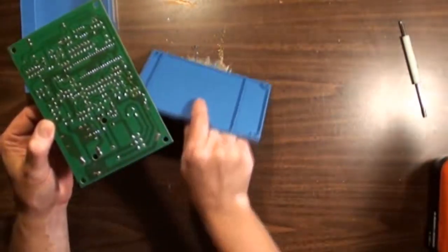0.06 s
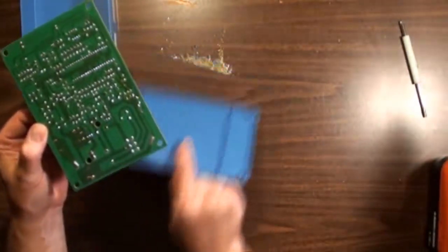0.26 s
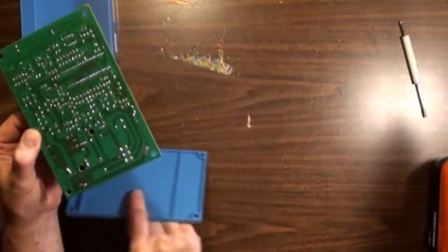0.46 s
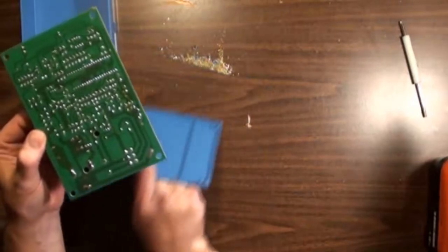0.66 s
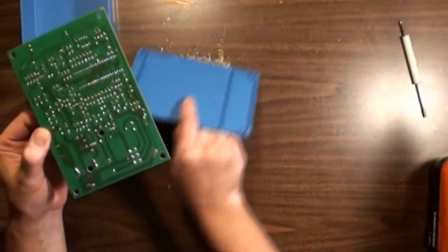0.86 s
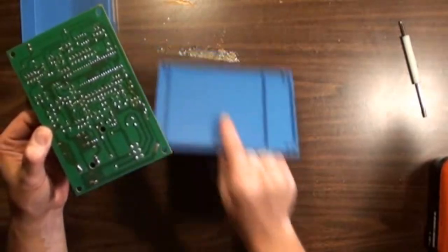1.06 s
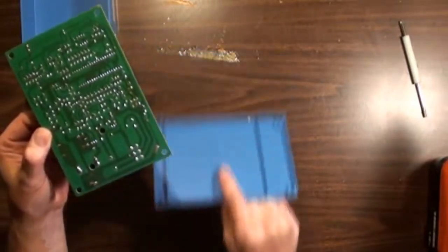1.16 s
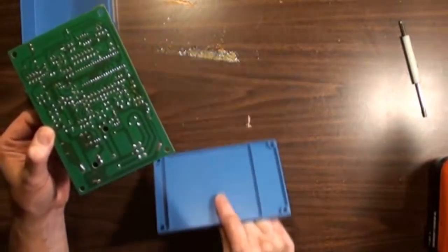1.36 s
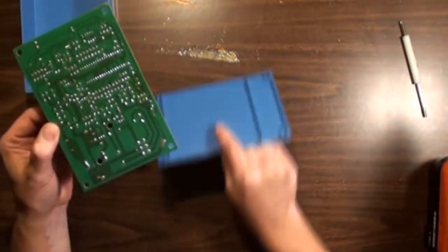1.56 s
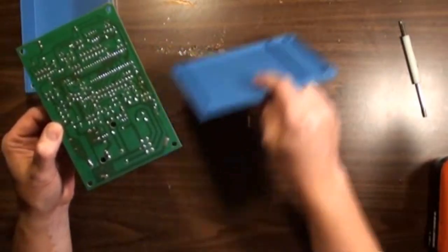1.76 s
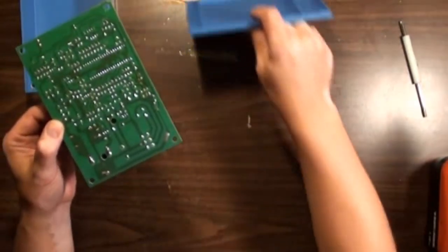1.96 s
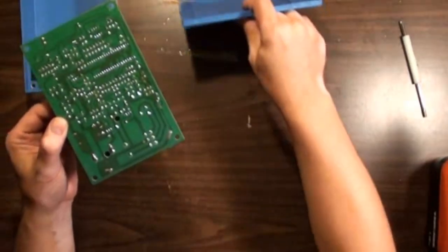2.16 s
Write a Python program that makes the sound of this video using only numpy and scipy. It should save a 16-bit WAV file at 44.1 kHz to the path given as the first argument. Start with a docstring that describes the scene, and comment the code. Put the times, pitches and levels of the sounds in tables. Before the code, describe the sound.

Hollow plastic housing knocked down and scraped across a wooden table in two gritty sweeps

```python
"""Plastic housing pushed through metal shavings

Close on a wooden table in a quiet room, stereo microphone: a hollow plastic housing is set down and pushed in two sweeps.
Random clicks of grit and shavings under its edge are filtered for the scrape and ring modes of shell and table top.
Blows are decaying noise bursts, part direct and part through the shell; short pushes ring the table as thuds.
Further off, sparse reflections answer the housing, over filtered noise for hiss and two faint sine whines.
"""
import sys
import numpy as np
from scipy import signal
from scipy.io import wavfile
from scipy.ndimage import uniform_filter1d, map_coordinates

SR = 44100
rng = np.random.default_rng(int(sys.argv[2]) if len(sys.argv) > 2 else 0)


def to_wav(sig):
    """Store sig (one row per channel, or 1-D mono) as 16-bit WAV at the path in sys.argv[1].

    Samples outside -1..1 are clipped; the rate is SR.
    """
    pcm = np.clip(np.atleast_2d(sig), -1, 1) * 32767
    pcm = np.round(pcm).astype(np.int16)
    wavfile.write(sys.argv[1], SR, pcm.T)  # frames by channels


def decibels_to_gain(level_db):
    """Convert a level in decibels to a linear amplitude gain (20 dB per decade)."""
    exponent = np.asarray(level_db, float) / 20
    return 10 ** exponent


N = 97020

# Spectrum of the room and microphone hiss: frequency_hz, density_db (per Hz, relative)
AIR_SPECTRUM = [(15, -65), (25, -16), (126, -6), (194, -12.5), (744, -8.5), (829, -14.5), (923, -11),
                (2430, -15), (3020, -18.5), (3270, -15), (15600, -23)]
# Faint whine in the room: pitch_hz, level_db (rms, before its small wavering)
WHINE_TONES = [(839.8, -67), (2519, -67)]
# Dying of the room's reflections: frequency_hz, t60_s
ROOM_DECAY = [(200, 0.2), (1500, 0.27), (8000, 0.14)]
# Modes of the wooden table top: pitch_hz, level_db (relative), t60_s
TABLE_MODES = [(69.4, -8, 0.57), (90, -27, .15), (136, 6, 0.67), (155, 2, 0.11), (204, 2.5, 0.36),
               (253, 10, 0.19), (326, -11.5, 0.22), (380, -21, 0.13)]
# Jolts into the table top: start_s, level_db (peak of one thud alone, before panning)
THUD_EVENTS = [(0.121, -50), (0.234, -27.5), (0.649, -19), (0.851, -45), (0.906, -34), (.99, -31),
               (1.452, -31), (1.71, -39), (1.77, -48), (1.93, -44)]
# Modes of the plastic shell: pitch_hz, level_db (relative), t60_s
SHELL_MODES = [(357, -9.5, .07), (412.3, -7, 0.097), (534, 1, 0.077), (619.5, -13.5, 0.12),
               (741.6, 7.5, 0.033), (895, 0.5, .04), (1060, -2, 0.017), (1123, -10, 0.055),
               (1190, -1, 0.048), (1291, 1, 0.053), (1348, -10.5, .05), (1463, 1.5, 0.025),
               (1730, 0.5, 0.016), (1770, -2, 0.023), (2190, -2, 0.028), (2860, -9, 0.024),
               (5000, -23, .02)]
# Blows of the housing on the wood: start_s, level_db (relative), hardness_hz, rattle_t60_s, struck_part_hz
BLOW_EVENTS = [(0.118, -43.5, 1390, 0.14, 945), (.146, -42.5, 910, 0.039, 514), (.17, -50, 800, 0.046, 400),
               (0.2353, -16.5, 2050, 0.13, 372), (0.269, -26, 600, 0.042, 387),
               (.642, -12.5, 1030, 0.046, 696), (0.652, -17.5, 990, 0.06, 660),
               (0.668, -14, 794, 0.053, 431), (.68, -14, 1320, 0.039, 720),
               (0.851, -15.5, 1480, 0.046, 1130), (1.028, -33, 1520, 0.026, 1200),
               (1.4495, -12.5, 8600, 0.16, 2860), (1.47, -21, 3000, 0.025, 2860),
               (1.5, -31, 3000, .03, 2860), (1.704, -12.5, 1200, 0.01, 730), (1.721, -28, 1190, 0.14, 735),
               (1.864, -19, 1630, 0.025, 1270), (1.921, -21.5, 8000, 0.024, 1130)]
# Spectrum of one grit click: frequency_hz, density_db (per Hz, relative)
GRIT_SPECTRUM = [(200, -28.5), (350, -13.5), (700, -7), (1420, -0.5), (2800, -3.5), (4280, -10),
                 (6300, -12), (7500, -15), (9000, -16.5), (12900, -30.5), (14000, -44), (17000, -110)]
# Spectrum of the metal shavings: frequency_hz, density_db (per Hz, relative)
SHAVINGS_SPECTRUM = [(3000, -28), (6200, -8.5), (7400, 3.5), (8800, -8), (12900, -14), (14200, -29),
                     (17000, -78)]
# The two sweeps, all levels relative; speed_db also scales the other three layers:
# time_s, speed_db, shell_pressure_db, table_weight_db, shavings_under_edge_db
SWEEP_PATHS = [
    [(0.26, -52, 11, 26, -13), (0.302, -47.5, 12.5, -3, 0.5), (0.406, -32.5, 4, -36, -2),
     (0.562, -24.5, -1, -29, -5), (0.628, -22.5, 5.5, -23, -7.5), (0.658, -26, 7, -8, -12),
     (0.694, -22.5, 9.5, -11, -13), (0.818, -27, -4, -36, -1.5), (0.86, -24.5, 8.5, -6, -13),
     (0.92, -31.5, 0.5, -16.5, -5), (0.964, -29.5, 7, -25, -5), (1.012, -25.5, 1, -12, -3),
     (1.046, -22.5, -10, -28, -7.5), (1.086, -29.5, -1, -29, -8), (1.182, -55.5, 0, -6, -25),
     (1.24, -64, -5, -26, -6)],
    [(1.5, -42.5, 6, -17, -12), (1.538, -46.5, 20, 9, 1), (1.584, -39, 10, -2, -5),
     (1.63, -28, 7.5, -26, -8.5), (1.692, -25, 7, -21, -7), (1.722, -24, 11, -24, -13),
     (1.764, -26, 1, -13, -6), (1.814, -22.5, 0.5, -31, -10), (1.834, -23, 4, -17, -12),
     (1.862, -24, -8, -14, -10.5), (1.92, -28, -3, -39, -5), (1.938, -32, 9.5, -30, -15),
     (2.008, -51.5, 4, -16, -20), (2.1, -67, -1, 10, -7)],
]
# Part of the shell that the sliding contact favours: time_s, favoured_hz
CONTACT_PATH = [(.3, 380), (.42, 1044), (.6, 1150), (.64, 700), (.67, 706), (.69, 1060), (.75, 1180),
                (.85, 1190), (.97, 1410), (1.04, 1240), (1.12, 1240), (1.5, 527), (1.57, 422), (1.63, 1130),
                (1.69, 1190), (1.71, 720), (1.74, 735), (1.78, 1260), (1.87, 1350), (1.92, 1120),
                (1.97, 1120)]

AIR_DB, AIR_SIDE_DB = -54.5, -8  # mid rms; side relative to mid
ROOM_DB, ROOM_LOW_HZ = -13, 365  # level of the reflections; low cut on what feeds them
PAN_DB = 0.25  # left up, right down
PUSH_S = 0.0045  # time constant of a push into the table
FAVOUR_DB, FAVOUR_OCTAVES = 17, 0.11  # boost and width around the touched part of the shell
CRACK_T60_S, CRACK_REACH, CRACK_TOP_HZ = 0.016, 3.4, 10260  # reach: times the blow's hardness
TICK_DB, RATTLE_DB = 1.5, -4.5  # direct crack and rattle, each relative to its peak
HARD_HZ = 3160  # the direct sound fades out for blows softer than this
SHELL_LOW_HZ, SHELL_TOP_HZ = 278, 3000  # low cut of the blows; high cut of the scraped shell
GRIT_PER_S, GRIT_SPREAD_DB, CLUMP_DB = 9000, 0.5, 0.5  # click rate; scales of size and clumping
SHIFT_DB = 3  # scale of each shell mode's random swelling
GRIT_DB, SHAVINGS_DB, SHELL_DB, TABLE_DB = 3, -2.5, -8, -1.5  # relative levels of the scrape's layers


def evened(x):
    """Signal scaled to an rms of one."""
    return x / np.sqrt(np.mean(x ** 2) + 1e-20)


def read(points, hz):
    """Curve read on a logarithmic frequency axis."""
    f, value = np.transpose(points)
    return np.interp(np.log(hz + 1), np.log(f + 1), value)


def coloured(x, points):
    """Causal minimum-phase filter with the given spectrum."""
    hz = abs(np.fft.fftfreq(4096, 1 / SR))
    log_gain = np.log(decibels_to_gain(np.maximum(read(points, hz), -100)))
    response = np.exp(np.conj(signal.hilbert(log_gain)))
    taps = np.fft.ifft(response).real[:2048]
    return signal.oaconvolve(x, taps)[:N]


def passed(x, hz, kind):
    """Third-order low or high pass."""
    sos = signal.butter(3, np.clip(hz, 20, 18000), kind, fs=SR, output="sos")
    return signal.sosfilt(sos, x)


def wander(per_s):
    """Straight lines between random normal values, per_s of them a second."""
    knots = rng.standard_normal(400)
    return map_coordinates(knots, [np.arange(N) * per_s / SR], order=1)


def ring(x, hz, db, t60):
    """One mode, a two-pole resonator struck by x."""
    radius = 10 ** (-3 / (max(t60, 0.003) * SR))
    poles = [1, -2 * radius * np.cos(2 * np.pi * hz / SR), radius ** 2]
    return decibels_to_gain(db) * signal.lfilter([0.5, 0, -0.5], poles, x)


def body(x, modes):
    """All modes of a body struck together by x."""
    return sum(ring(x, *mode) for mode in modes)


def favour(hz, part_hz):
    """Extra dB for modes near the part of the shell in contact."""
    octaves = np.log2(hz / part_hz)
    return FAVOUR_DB * np.exp(-(octaves / FAVOUR_OCTAVES) ** 2)


def air():
    """Room and microphone hiss as filtered mid and side noise, with two thin sines wavering in level."""
    mid, side = (evened(coloured(rng.standard_normal(N), AIR_SPECTRUM)) for _ in range(2))
    hiss = decibels_to_gain(AIR_DB) * (mid + decibels_to_gain(AIR_SIDE_DB) * np.outer([1, -1], side))
    t = np.arange(N) / SR
    whine = np.zeros(N)
    for hz, db in WHINE_TONES:
        level = np.sqrt(2) * decibels_to_gain(db + 1.8 * wander(9.5))
        whine += level * np.sin(2 * np.pi * hz * t)
    return hiss + whine


def room(x):
    """Sparse random reflections, each band dying at its own speed, other ones for each side."""
    shape = (2, SR // 2)
    taps = rng.choice([-1., 1.], shape) * (rng.random(shape) < 0.06)
    taps[:, :120] = 0  # a short gap before the first reflection
    hz, t, bands = signal.stft(taps, SR, nperseg=256)
    decay = decibels_to_gain(-60 * t / read(ROOM_DECAY, hz)[:, None])
    tail = signal.istft(bands * decay, SR, nperseg=256)[1]
    tail = tail / np.linalg.norm(tail, axis=1)[:, None]
    return signal.fftconvolve(x[None], tail, axes=1)[:, :N]


def thuds():
    """Short decaying pushes ring the modes of the table top."""
    push = np.exp(-np.arange(N) / SR / PUSH_S)
    thud = body(push, TABLE_MODES)
    at = np.zeros(N)
    for start_s, db in THUD_EVENTS:
        at[round(start_s * SR)] = decibels_to_gain(db)
    return signal.fftconvolve(at, thud / abs(thud).max())[:N]


def blows():
    """Noise bursts give a sharp crack and a dying rattle, duller when softer; the rattle rings the shell."""
    out = np.zeros(N + SR)
    t = np.arange(SR // 2) / SR
    for start_s, db, hard_hz, t60, part_hz in BLOW_EVENTS:
        chatter = rng.standard_normal(len(t)) * np.minimum(t / 0.00026, 1)
        rattle = passed(chatter, hard_hz, "low") * decibels_to_gain(-60 * t / max(t60, 0.005))
        crack = passed(chatter * decibels_to_gain(-60 * t / CRACK_T60_S), CRACK_REACH * hard_hz, "low")
        shell = sum(ring(rattle, hz, mode_db + favour(hz, part_hz), ring_s)
                    for hz, mode_db, ring_s in SHELL_MODES)
        direct = decibels_to_gain(TICK_DB) * crack / abs(crack).max()
        direct = direct + decibels_to_gain(RATTLE_DB) * rattle / abs(rattle).max()
        for _ in range(2):  # twice, for a steeper slope
            direct = passed(direct, CRACK_TOP_HZ, "low")
        # hard blows are heard directly, soft ones mostly through the shell
        directness = np.tanh((hard_hz / HARD_HZ) ** 2)
        sound = shell / abs(shell).max() + directness * direct
        out[round(start_s * SR):][:len(t)] += decibels_to_gain(db) * passed(sound, SHELL_LOW_HZ, "high")
    return out[:N]


def clicks():
    """Dense uneven clicks of grain and shavings passing the edge, in clumps of level."""
    uneven = np.minimum(rng.exponential(1, N), 5)
    size = decibels_to_gain(GRIT_SPREAD_DB * uneven + CLUMP_DB * wander(70))
    return size * rng.choice([-1., 1.], N) * (rng.random(N) < GRIT_PER_S / SR)


def scrape():
    """Speed sets the grit, pressure the shell, weight the table; shell modes swell as the contact moves."""
    t = np.arange(N) / SR
    moving = np.zeros(N)
    for path in SWEEP_PATHS:
        start_s, end_s = path[0][0], path[-1][0]
        moving += np.interp(t, [start_s, start_s + 0.0067, end_s - 0.02, end_s], [0, 1, 1, 0])
    rows = np.vstack(SWEEP_PATHS)
    speed_db, press_db, weight_db, shavings_db = (np.interp(t, rows[:, 0], column) for column in rows.T[1:])
    part_hz = np.interp(t, *np.transpose(CONTACT_PATH))
    speed = moving * decibels_to_gain(speed_db)
    edge = clicks()

    shell = np.zeros(N)
    for hz, db, t60 in SHELL_MODES:
        swell_db = SHIFT_DB * wander(12) + favour(hz, part_hz)
        shell += ring(edge * decibels_to_gain(swell_db), hz, db, t60)
    shell = passed(shell, SHELL_TOP_HZ, "low")
    # level out the swells, so that pressure and speed alone set the loudness
    shell /= np.sqrt(uniform_filter1d(shell ** 2, 4000) + 1e-12)

    table = body(edge * speed * decibels_to_gain(weight_db), TABLE_MODES)
    table = table / np.std(body(edge, TABLE_MODES))

    grit = decibels_to_gain(GRIT_DB) * evened(coloured(edge, GRIT_SPECTRUM))
    shavings = decibels_to_gain(SHAVINGS_DB + shavings_db) * evened(coloured(clicks(), SHAVINGS_SPECTRUM))
    housing = speed * (grit + shavings + decibels_to_gain(SHELL_DB + press_db) * shell)
    return housing, decibels_to_gain(TABLE_DB) * table


def scene():
    """Housing and table close to the microphone, slightly left; the room's answer and air behind them."""
    housing, table = scrape()
    housing = housing + blows()
    reflections = decibels_to_gain(ROOM_DB) * room(passed(housing, ROOM_LOW_HZ, "high"))
    pan = decibels_to_gain(np.array([[PAN_DB], [-PAN_DB]]))
    return (housing + table + thuds()) * pan + reflections + air()


def roll_off(x):
    """The treble ends steeply here."""
    return signal.sosfilt(signal.butter(12, 15760, fs=SR, output="sos"), x)


def record(dry):
    """The stereo microphone cuts the deep bass below 64 Hz."""
    mix = passed(dry, 64, "high")
    return roll_off(mix)


dry = scene()
out = record(dry)
to_wav(out)
```